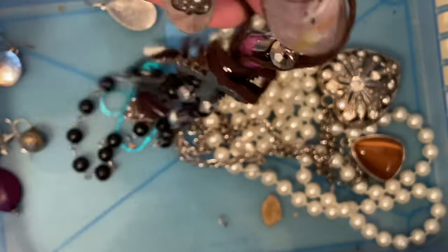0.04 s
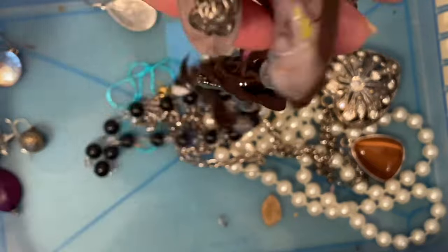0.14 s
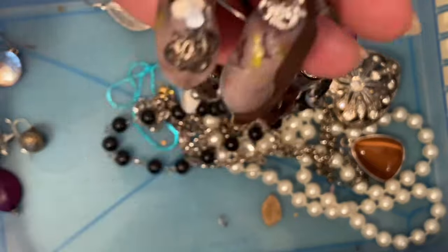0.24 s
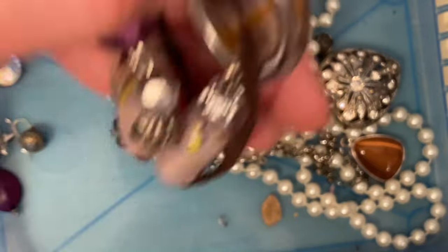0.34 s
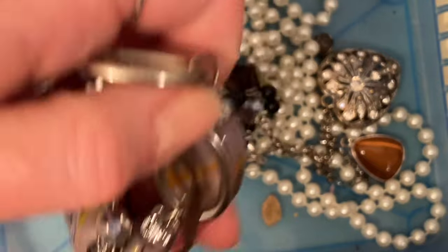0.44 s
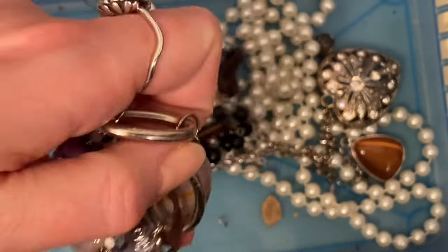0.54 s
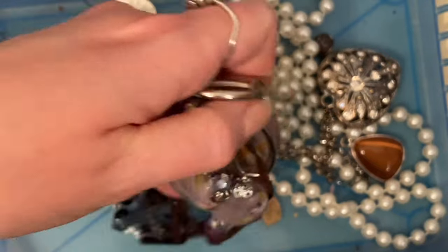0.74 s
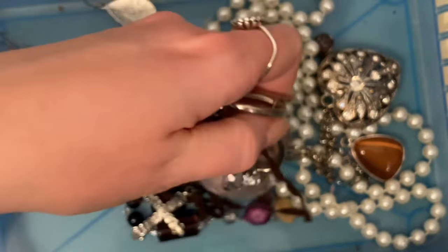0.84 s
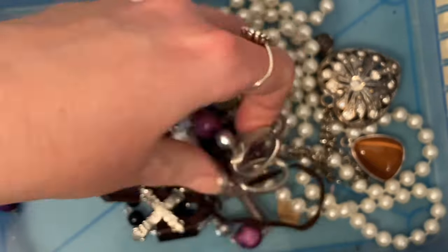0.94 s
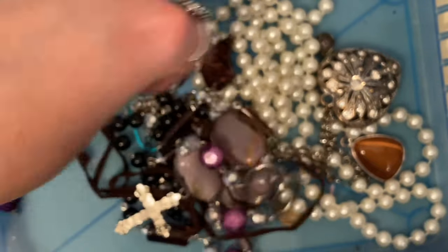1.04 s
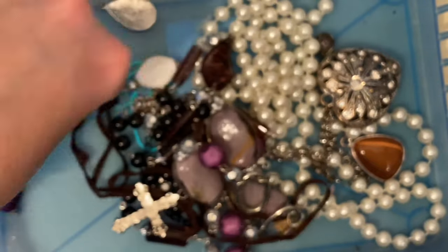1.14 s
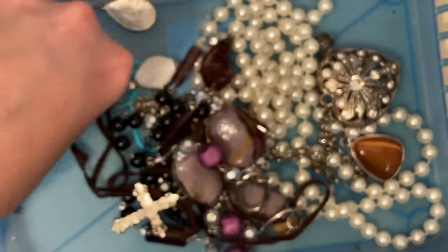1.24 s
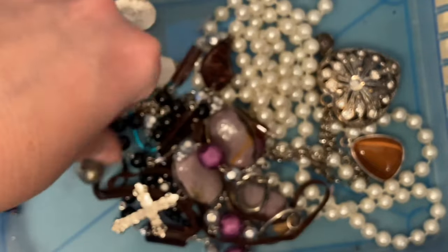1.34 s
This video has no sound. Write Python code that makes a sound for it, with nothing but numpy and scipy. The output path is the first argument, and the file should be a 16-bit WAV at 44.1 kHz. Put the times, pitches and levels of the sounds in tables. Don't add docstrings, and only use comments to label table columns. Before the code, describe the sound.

Close, dry clatter of hard beads with bright chain ticks; light clicks first, denser rattling next, then a loud drop onto a plastic tub floor, and a few small settling clicks over a faint low drone.

```python
import sys
import numpy as np
from scipy import signal
from scipy.fft import rfft, irfft, next_fast_len
from scipy.io import wavfile
from scipy.ndimage import uniform_filter1d

SR = 44100
rng = np.random.default_rng(int(sys.argv[2]) if len(sys.argv) > 2 else 0)


def invert_db(x):
    u = np.asarray(x, float) / 20
    return 10 ** u


def generate_wav(sig):
    pcm = np.round(np.clip(np.atleast_2d(sig).T, -1, 1) * 32767).astype(np.int16)
    wavfile.write(sys.argv[1], SR, pcm)


N = 59535


def unit(x):
    return x / np.sqrt(np.mean(x ** 2) + 1e-20)


def along(points, hz):
    f, v = np.transpose(points)
    return np.interp(np.log(hz + 1), np.log(f + 1), v)


def filtered(x, response):
    size = next_fast_len(N + 8192)
    return irfft(rfft(x, size) * response(np.fft.rfftfreq(size, 1 / SR)), size)[..., :N]


def noise(colour):
    return unit(filtered(rng.standard_normal(N), lambda hz: invert_db(along(colour, hz))))


def lay(starts_s, shapes):
    first = np.round(starts_s * SR).astype(int).clip(0)
    at = first[:, None] + np.arange(shapes.shape[1])
    return np.bincount(at.ravel(), shapes.ravel(), N + SR)[:N]


def fade(t, t60, rise_s):
    e = invert_db(-60 * t / t60) * (1 - np.exp(-t / rise_s)) ** 2
    return e / e.max(axis=-1, keepdims=True)


# hz, level_db
HUM = [(30, -22), (44, 3), (75, -8.5), (200, -25.5), (400, -10.5), (700, -45), (1600, -30), (15000, -62)]


def hum():
    return invert_db(-49) * noise(HUM)


# start_s, bead_rattle_db, metal_share_db
STIR = [(0, -30.5, 6), (.12, -37, 10.5), (.25, -34.5, -15), (.33, -45.5, 11), (0.389, -31, -45),
        (.47, -39, 17), (.58, -20.5, 1), (0.691, -36, 5), (.75, -21, 3), (.86, -30.5, 2), (.95, -18, 19),
        (1.039, -27.5, 13.5), (1.209, -44, -6), (1.231, -53, -14), (1.259, -32.5, -20), (1.31, -35.5, -13),
        (1.335, -57, -19)]
BEAD_HZ, UPPER_DB = 1949, -9


def rattle():
    s, stir_db, metal_db = np.transpose(STIR)
    now = np.arange(N) / SR

    beads_n, links_n = 900, 2200
    at, r = rng.uniform(0, N / SR, beads_n), rng.standard_normal(beads_n)
    size_db = 3 * rng.exponential(size=beads_n).clip(max=np.pi)
    small = unit(clacks(at, size_db, BEAD_HZ * np.exp(0.244 * r), UPPER_DB - 4 * r))

    at = rng.uniform(0, N / SR, links_n)
    size_db = 6.2 * rng.exponential(size=links_n).clip(max=np.e)
    fine = unit(ticks(at, size_db, 0.0019))

    shake = np.sqrt(abs(uniform_filter1d(small ** 2, size=600)))
    low = shake * noise([(60, -11.5), (130, -13), (250, -10.0), (400, -4),
                         (800, -23), (1200, -12.0), (2000, -23.5)])
    mix = small + invert_db(np.interp(now, s, metal_db) - 16.5) * fine + invert_db(-12.5) * low
    return invert_db(np.interp(now, s, stir_db)) * mix


# hz, level_db
BEAD_COLOUR = [(300, -19), (900, -7), (1900, -3), (2600, 1.5), (4000, -4.5), (7000, -10.5), (15000, -21.5)]


def clacks(s, db, hz, upper_db):
    rise_s, t60, upper_t60 = 0.0007, 0.0055, 0.021
    t, r = np.arange(SR // 90)[None] / SR, rng.standard_normal((len(s), 3))
    env = invert_db(db)[:, None] * fade(t, t60 * np.exp(0.038 * r[:, :1]), rise_s)

    turn = 2 * np.pi * hz[:, None] * t
    share = invert_db(upper_db[:, None] - 60 * t / upper_t60)
    ratio = 1.766 * (1 + 0.078 * r[:, 2:]) * np.sqrt(BEAD_HZ / hz[:, None])
    ring = np.sin(turn + 9 * r[:, 1:2]) + share * np.sin(ratio * turn)
    ring = ring / np.hypot(1, share[:, :1])

    snap_db = db - 8 + 0.079 * (db - db.max())
    snap = invert_db(snap_db)[:, None] * fade(t, 0.015, 0.00037)
    start = s - 1.31 * rise_s
    both = lay(start, env * ring) + lay(start, snap) * noise(BEAD_COLOUR)
    return filtered(both, lambda f: (1j * f / (250 + 1j * f)) ** 2)


# peak_s, level_db (peak), pitch_hz
HANDLED = [(0.0123, -14, 1800), (0.0253, -41, 1610), (0.039, -20, 1760), (0.0521, -45, 2080),
           (0.0614, -19.5, 2160), (0.0761, -18, 1700), (0.0922, -16, 2100), (0.1105, -16, 2320),
           (0.1219, -16.5, 2430), (0.1506, -27, 1650), (0.1558, -40, 1990), (0.1661, -21, 2180),
           (0.1778, -15, 1770), (0.1976, -10, 2020), (0.2053, -26, 1400), (0.2195, -11, 1730),
           (0.2311, -14.5, 2160), (0.2448, -18, 1880), (0.2802, -22, 1830), (0.2848, -25.6, 1890),
           (0.3219, -27, 2150), (0.3268, -24.5, 2530), (0.3514, -21, 2100), (0.3645, -18.5, 1800),
           (0.3759, -12, 2030), (0.3892, -11, 1830), (0.4009, -10, 1930), (0.4302, -22, 1860),
           (0.4371, -12, 2240), (0.4426, -16, 1680),
           (0.486, -10.8, 1980), (0.4979, -8.5, 2240), (0.506, -6.0, 1840), (0.5102, -10.5, 1900),
          (0.515, -11, 2150), (0.533, -6.5, 1730), (0.5386, -3.5, 2000), (0.544, -15, 2600),
          (0.5505, -6.5, 1730), (0.5589, -2, 2350), (0.5638, -2.7, 1870), (0.5763, 0.5, 1980),
          (0.5902, 0, 1890), (0.5976, -9, 1870), (0.6099, -7.2, 2140), (0.617, -12, 1750),
          (0.638, -10.5, 1590), (0.6463, -11.5, 2120), (0.6522, -6, 2020), (0.661, -10, 1990),
          (0.6723, -10, 1880), (0.6809, -14, 1660), (0.6942, -18, 1830), (0.6985, -15.5, 2090),
          (0.7104, -10.5, 2040), (0.72, 0.5, 1950), (0.7253, -5.5, 2140), (0.728, -5.5, 2170),
          (0.7312, -8.2, 1900), (0.7436, 0.5, 1830), (0.747, -3, 1830), (0.7574, -2, 1900),
          (0.771, -13.5, 1790), (0.777, -16, 1980), (0.784, -19, 1680), (0.7887, 1.4, 1700)]
# peak_s, level_db (peak), pitch_hz, upper_mode_db
MIXED = [(0.8147, -34, 1470, -5), (0.8238, -6, 2330, 7), (0.8332, 4.8, 1794, 2), (0.8397, -3.5, 1610, 4),
         (0.8671, -15, 1510, 7), (0.8753, -10, 1660, 0), (0.8825, -16, 1540, -6), (0.8907, -9, 2160, -10),
         (0.8978, 7, 1900, -18), (0.9053, -10, 1660, -8), (0.908, 1, 1900, -7.3), (0.911, -10, 2510, 8),
         (0.9212, -10, 2420, -1.6), (0.9262, -7, 2010, -3.4), (0.934, 4.5, 1880, -5),
         (0.9401, -4.4, 1840, -4.1), (0.9447, -11, 2310, -2.2), (0.9508, -7.5, 1670, -3),
         (0.9556, 2, 1900, -7), (0.9608, 3, 1670, 0), (0.9657, -10, 2220, 16), (0.9693, -4.5, 2000, -1),
         (0.9779, -12, 1650, -7), (0.9866, -3, 2350, 0), (0.998, -16, 1770, 0), (1.0055, -13.5, 1960, 1),
         (1.0097, -29.5, 1670, -4), (1.0216, -22, 1810, -9), (1.031, -10.6, 1730, 12),
         (1.0402, -15, 1940, -10), (1.0544, -39, 1690, 5.2), (1.0639, -11, 1470, 3),
         (1.0677, -8, 2460, 15), (1.0787, -13, 1640, -1), (1.084, -1.5, 1710, 4.5),
         (1.1147, -35, 1830, 1.9), (1.1255, -33, 1460, -1.1), (1.1434, -12, 1600, 1.5),
         (1.1712, -20.1, 2600, -3), (1.2465, -10, 1990, -3), (1.2646, -30, 1960, -2.9),
         (1.2701, -27, 2020, -16), (1.2731, -26, 2300, -8), (1.2984, -23.9, 1430, 8),
         (1.3062, -19.5, 1650, -1), (1.32, -26, 1880, 0.9),
         (0.5741, 3, 1935, -18),
    (0.5858, -4, 2040, -14),
    (1.2418, -20.5, 2298, -9),
]


def beads():
    s, db, hz = np.array(HANDLED).T
    held = clacks(s, db - 2, hz, UPPER_DB + 2 * rng.standard_normal(len(s)))
    s, db, hz, upper_db = np.array(MIXED).T
    return held + clacks(s, db - 2, hz, upper_db)


# hz, level_db
METAL_COLOUR = [(2000, -15.5), (4500, 0), (8000, 5), (12500, -3.5), (15500, -7)]


def ticks(s, db, t60):
    t, r = np.arange(SR // 70)[None] / SR, rng.uniform(size=(len(s), 2))
    burst = invert_db(db)[:, None] * fade(t, t60 * (0.5 + r[:, :1]), 0.0001)
    spike_hz = 7000 + 6000 * r[:, 1:]
    spike = invert_db(db)[:, None] * fade(t, 0.0015, 0.0001) * np.sin(2 * np.pi * spike_hz * t)
    start = s - 0.0003
    return lay(start, burst) * noise(METAL_COLOUR) * 0.64 + lay(start, spike)


# start_s, level_db (peak)
LINKS = [(0.0405, -27), (0.0615, -22), (0.0927, -13), (0.1223, -10), (0.1778, -24), (0.1973, -4),
         (0.2012, -4), (0.246, -12.5), (0.2695, -21.5), (0.3075, -31), (0.3486, -6.5), (0.3756, -7),
         (0.39, -27), (0.4008, -9.5), (0.4297, -37), (0.4429, -8), (0.498, -15), (0.51, -20),
         (0.5145, -10), (0.5349, -9), (0.5393, -30), (0.5506, -22), (0.5594, -30), (0.5748, 1),
         (0.5806, -6), (0.5908, -1), (0.6109, -8.5), (0.6805, -13),
         (0.7183, -6), (0.722, -2), (0.729, -24), (0.7457, -3.5), (0.7585, 3.5), (0.7874, 4.5),
              (0.7929, -27), (0.824, -11), (0.8315, -7), (0.839, -16), (0.873, -18), (0.8912, -2),
              (0.897, 0.5), (0.9014, 1.5), (0.906, -12), (0.91, -16), (0.9324, 10), (0.94, 2),
              (0.9512, 5.5), (0.9598, 0), (0.9868, -0.5), (1.0163, -7.5), (1.0242, -17), (1.2452, -15)]


def links():
    s, db = np.array(LINKS).T
    return ticks(s, db - 3, 0.0074)


# start_s, level_db (peak), deepest_mode_db, second_mode_db, dull_body_db
THUMPS = [(0.371, -27, -11.5, 0, 2), (0.508, -22, -22.5, -12, -0.5), (0.573, -39, -12, 0, -9),
          (0.608, -37.5, 8, 12, -4), (0.719, -20.5, -4.5, -0.5, -2), (0.743, -20.5, -4, 2, -2),
          (0.785, -32.5, -1, 7, 3), (0.825, -28, -4, -13, 7.5), (0.9, -16.5, -15, -4, -7),
          (0.935, -9.5, -12.5, -0.5, -2.5), (0.954, -19.5, -15, -1, -1.5), (0.984, -19, -4.5, 0.5, -1),
          (1.1, -36, 0, 0, 4), (1.138, -29.5, -24, 5, 0.5), (1.176, -16.5, -7.5, -2, -6),
          (1.242, -23.5, -5, 6, 4)]
# pitch_hz, level_db, t60_s, rise_s
TUB = [
    (116.6, -3.5, 0.093, 0.034),
    (216, -11.5, 0.062, 0.014),
    (389.6, -6.5, 0.03, 0.0033),
    (548.7, -15, 0.029, 0.0011),
]
# hz, level_db
THUD = [(70, -15.5), (400, 0), (900, -10), (1400, -30)]


def thumps():
    s, db, deep_db, second_db, body_db = np.transpose(THUMPS)
    sag_per_s = 0.52
    t, r = np.arange(SR // 8)[None] / SR, rng.standard_normal((len(s), 2 * len(TUB)))
    floor = lay(s, invert_db(db + body_db - 7.5)[:, None] * fade(t, 0.058, 0.0031)) * noise(THUD)
    for k, (hz, level, t60, rise_s) in enumerate(TUB):
        mode_db = db + level + deep_db * (k == 0) + second_db * (k == 1) + r[:, k]
        size = invert_db(mode_db)[:, None] * fade(t, t60, rise_s)
        pitch_hz = hz * (1 + 0.024 * r[:, [-k - 1]])
        floor = floor + lay(s, size * np.sin(2 * np.pi * pitch_hz * t * (1 - sag_per_s * t)))
    return floor


# hz, t60_s
WALLS = [(300, 0.25), (2000, 0.046), (12000, 0.051)]


def walls(x):
    hz, t, z = signal.stft(rng.standard_normal((3, SR // 5)), SR, nperseg=128)
    dying = z * invert_db(-60 * t / along(WALLS, hz)[:, None])
    tail = signal.istft(dying, SR, nperseg=128)[1]
    tail = tail / np.linalg.norm(tail[0])
    return signal.fftconvolve(np.pad(x, (40, 0))[None], tail, axes=1)[:, :N]


# hz, left_over_right_db
LEAN = [(200, .5), (380, 5), (750, 4), (1300, .5), (2000, 0)]
# hz, left_lead_rad
TWIST = [(200, 0), (1400, 0.35), (2800, 0.36), (4500, 1.2562), (8600, 3), (11500, 3.5), (15200, 5.5)]


def scene():
    heap = beads() + links() + rattle() + thumps()
    echo = walls(heap)
    near = heap + invert_db(-10) * echo[0] + hum()
    side = np.array([[0.5], [-0.5]])

    def ports(hz):
        return invert_db(side * along(LEAN, hz)) * np.exp(1j * side * along(TWIST, hz))

    apart = filtered(echo[1:], lambda hz: hz / (hz + 715))
    return filtered(near, ports) + invert_db(-10.5) * apart


def roll_off(x):
    return signal.sosfilt(signal.butter(12, 15670, fs=SR, output="sos"), x)


def record(dry):
    mix = np.clip(dry, -1, 1)
    return roll_off(mix)


dry = scene()
out = record(dry)
generate_wav(out)
```